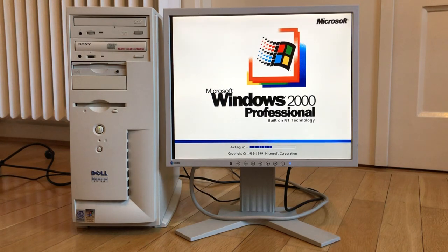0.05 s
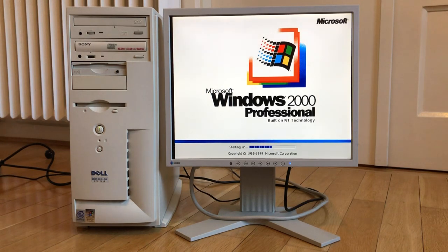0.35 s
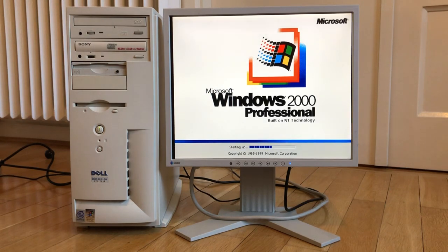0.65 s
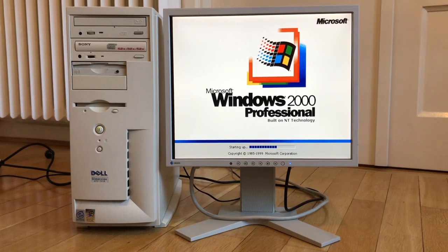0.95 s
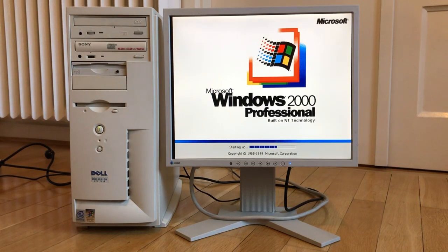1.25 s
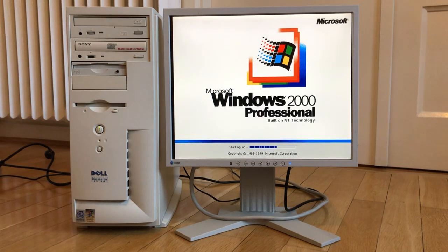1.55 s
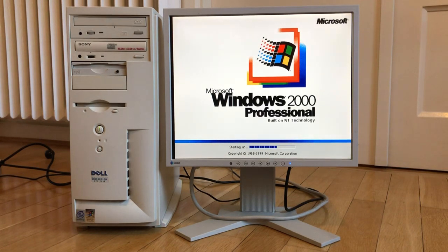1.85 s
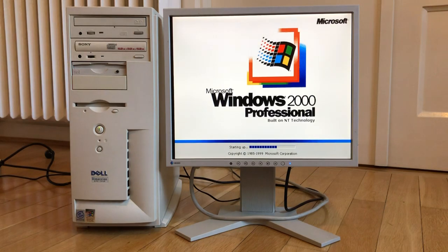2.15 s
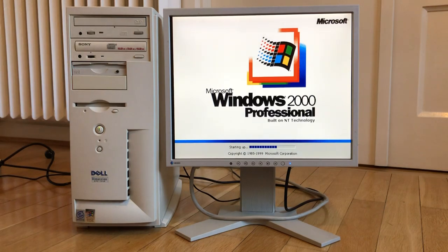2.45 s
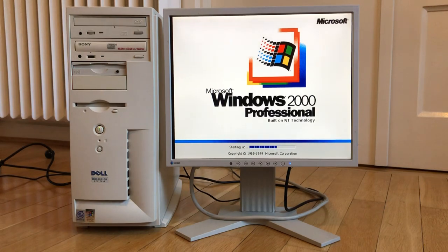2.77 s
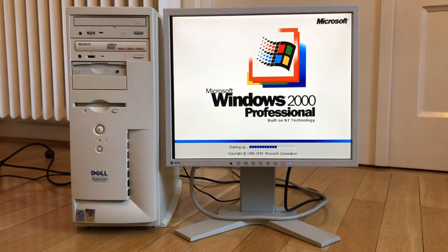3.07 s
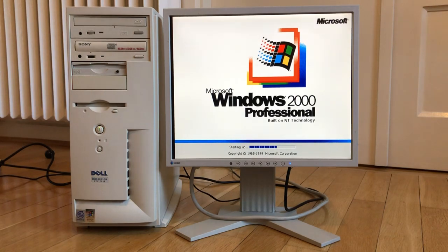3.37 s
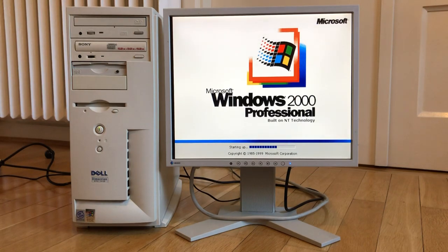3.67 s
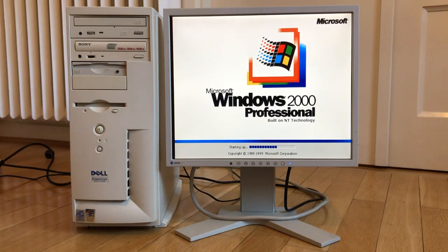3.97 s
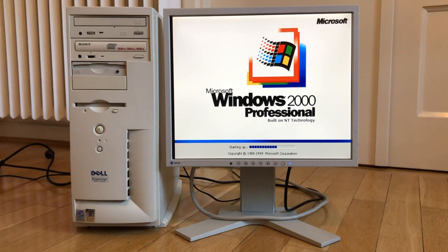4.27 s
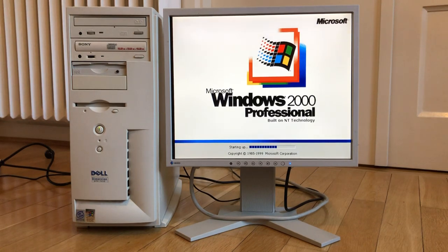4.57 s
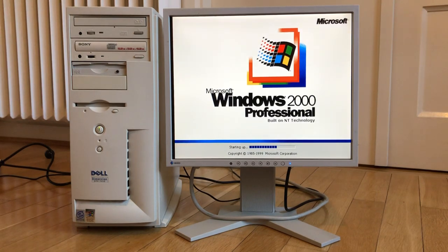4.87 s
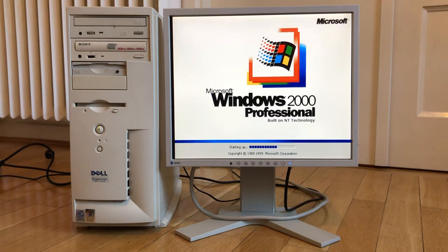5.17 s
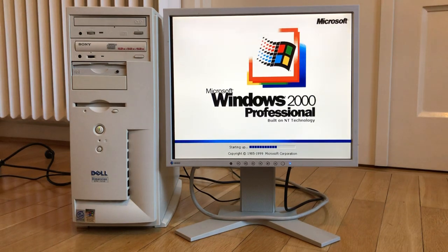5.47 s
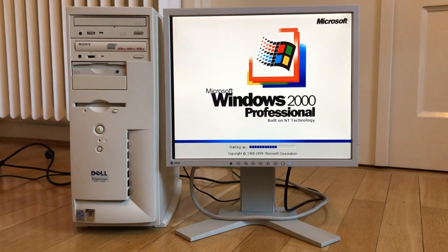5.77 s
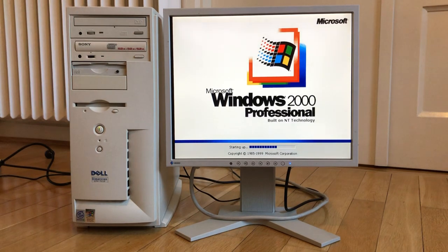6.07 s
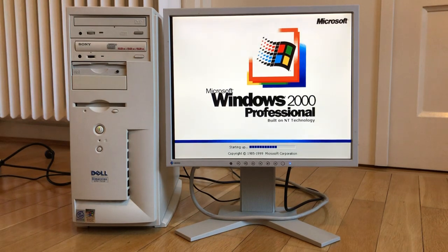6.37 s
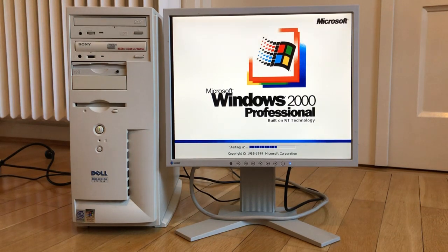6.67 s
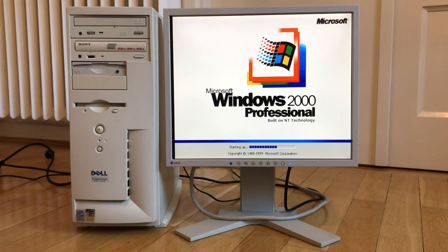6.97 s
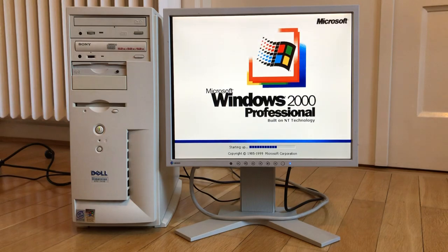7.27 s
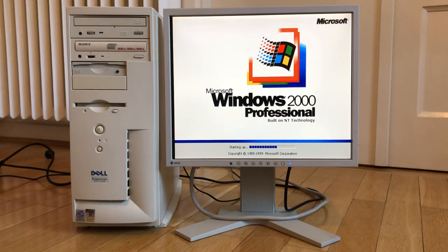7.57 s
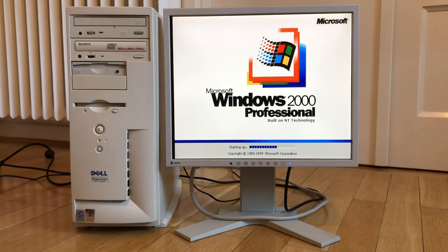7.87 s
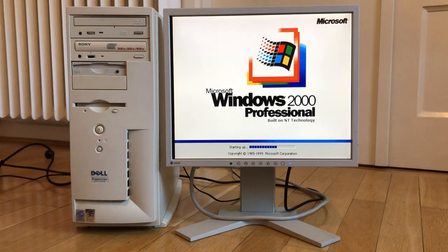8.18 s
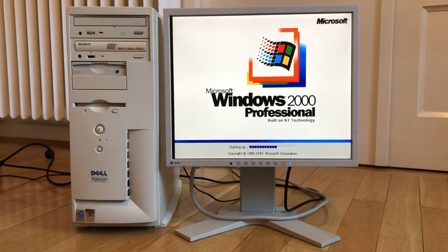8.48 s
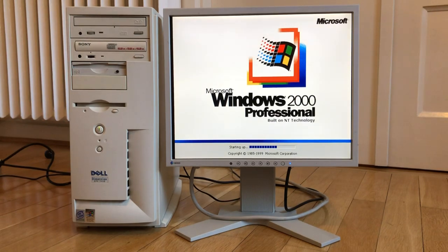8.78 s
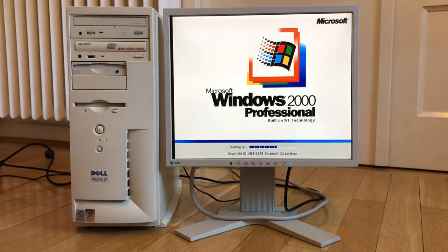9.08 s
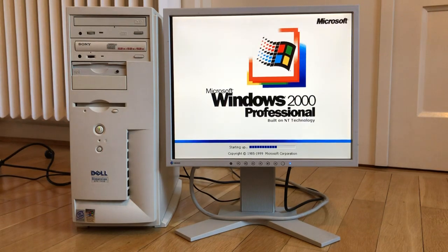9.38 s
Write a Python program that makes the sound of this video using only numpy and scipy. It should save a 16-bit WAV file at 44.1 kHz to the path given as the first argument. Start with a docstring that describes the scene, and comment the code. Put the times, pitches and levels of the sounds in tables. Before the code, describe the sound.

Rapid hard drive rattling with soft thumps thins to scattered ticks while a desktop computer hums and its fans whir.

```python
"""Quick clicks and soft thumps come from a desktop computer starting up in a quiet room.
The hard drive's head jumps between tracks ("seeks") in fast even runs, then in uneven chatter and
single bursts. Every seek clicks in the drive's metal shell and thumps the panels of the tower.
Underneath, the spinning disks hum, motors and bearings whine and pulse, and the fans rush."""
import sys
import numpy as np
from scipy import signal
from scipy.fft import rfft, irfft, next_fast_len
from scipy.io import wavfile
from scipy.ndimage import uniform_filter1d, map_coordinates

SR = 44100
rng = np.random.default_rng(int(sys.argv[2]) if len(sys.argv) > 2 else 0)


def log_audio(samples):
    """Write samples as a 16-bit WAV file to the path given in sys.argv[1]."""
    # one column per channel
    frames = np.atleast_2d(samples).T
    # limit to full scale, then quantise
    limited = np.clip(frames, -1, 1)
    pcm = np.round(limited * 32767).astype(np.int16)
    wavfile.write(sys.argv[1], SR, pcm)


N = 420273
TIME = np.arange(N) / SR
RING_TIME = np.arange(SR // 2) / SR


def head_clicks(seeks, shell_db=18, cage_db=16, crackle_db=16, cage_fade_s=0.035):
    """A coil kicks the head's arm three times a seek: to start it, to brake halfway and to stop it."""
    # The notes of the drive's metal shell. Each row: pitch in Hz, width in Hz, relative level in dB.
    shell_notes = [(1560, 18, -3.5), (2160, 100, -11), (2557, 88, -5.5), (2698, 120, 2), (2794, 96, -2),
                   (2985, 55, -3.5), (3114, 44, -10), (4090, 64, -1.5), (4260, 50, -12.5), (4600, 260, -2),
                   (5010, 67, -18), (5740, 140, -9), (6400, 80, -15), (6840, 130, -10.5), (7130, 66, -10),
                   (7960, 110, -12.5)]
    # The tone of the arm's rattle. Each row: frequency in Hz, gain in dB.
    rattle_tone = [(150, -17), (450, 7.5), (800, 5), (1250, 2), (1800, -1), (2700, 6), (3400, -6),
                   (4500, 2), (5300, -2), (6800, 1), (8000, -0.5), (10000, -21.5), (15000, -43)]
    start, db, travel, stop_db, _ = seeks
    kicks = pulses(start, amp(db))
    kicks -= pulses(start + travel / 2, amp(db + stop_db / 2 - 6))
    kicks += pulses(start + travel, amp(db + stop_db))
    # The cage that holds the drive answers every kick alike, so an even run buzzes.
    cage_ring = rng.standard_normal(len(RING_TIME)) * amp(-60 * RING_TIME / cage_fade_s)
    cage_ring *= 1 - np.exp(-RING_TIME / 0.00098)
    rattle = amp(cage_db) * convolved(kicks, cage_ring) + amp(crackle_db) * crackle(kicks, fade_s=0.12)
    shell = amp(shell_db) * struck(kicks, shell_notes)
    return shell + filtered(rattle, lambda hz: amp(along(rattle_tone, hz)))


def all_seeks(scatter_s=.0005, scatter_travel=.15, scatter_db=1.5, stop_db=-1.5):
    """Every jump of the head, as five arrays: start, click level, travel time, stop kick, thump level."""
    # One step of a run is a long seek and a short one back. Each row: delay in seconds, relative click
    # level in dB, travel time in seconds, stop kick in dB against the first, relative thump level in dB.
    run_step = [(0, -43.5, .0068, -4.5, -45.5), (0.0155, -49, .005, -1, -46)]
    # Bursts of seeks. Each row: start in seconds, number of seeks, gap in seconds,
    # travel time in seconds, relative click level in dB, relative thump level in dB.
    bursts = [(.1987, 1, 0, .0034, -46, -38.5), (0.5819, 1, 0, .0045, -49, -41.5),
              (.880, 6, 0.018, 0.0052, -44.5, -40), (1.0063, 2, .03, 0.004, -50.5, -60),
              (1.1077, 2, 0.0069, .003, -46, -41), (1.14, 3, .02, 0.0043, -45, -40.5),
              (1.213, 3, 0.022, .004, -47.5, -47.5), (1.2798, 2, 0.018, .004, -44.5, -42.5),
              (1.332, 2, .021, .005, -45, -41), (1.397, 2, .0197, 0.0039, -47, -42),
              (1.438, 2, 0.017, .003, -45.5, -38), (1.521, 3, .027, 0.0037, -46, -35.5),
              (1.607, 4, 0.017, .0075, -44.5, -45), (1.68, 6, .0127, 0.0064, -44, -39.5),
              (1.8024, 5, 0.019, .0066, -45.5, -43.5), (1.915, 6, .0177, .007, -45.5, -43),
              (3.599, 1, 0, 0.0066, -43.5, -36.5), (3.691, 2, .0243, 0.0044, -47.5, -42),
              (3.780, 3, 0.024, 0.0066, -49, -50), (3.862, 2, 0.0063, 0.0048, -47.5, -46),
              (4.051, 1, 0, .0013, -51.5, -51), (4.143, 3, 0.0087, 0.0042, -46, -51),
              (4.701, 2, 0.019, .005, -44, -35), (5.464, 1, 0, .006, -49.5, -43),
              (5.7048, 1, 0, 0.0028, -45.5, -39.5)]
    seeks = [(start + delay, *rest) for start in run_times() for delay, *rest in run_step]
    for start, count, gap, travel, click_db, thump_db in bursts:
        # No two seeks of a burst are quite alike.
        for k, (late, far, hard, brake) in enumerate(rng.standard_normal((round(count), 4))):
            seeks.append((start + k * gap + scatter_s * late,
                          click_db + scatter_db * hard,
                          travel * np.exp(scatter_travel * far),
                          stop_db + scatter_db * brake,
                          thump_db + scatter_db * hard))
    return np.transpose(seeks)


def run_times(first_pass_s=.002646, turn_s=.005986):
    """Each step of an even run waits for the right spot on the disk, which comes by once a turn."""
    # The head goes to and fro between two tracks.
    # Each row: rough start in seconds, number of steps, average gap in seconds.
    runs = [(.2349, 11, .03245), (.6012, 8, .0359)]
    wanted = np.concatenate([start + gap * np.arange(steps) for start, steps, gap in runs])
    return first_pass_s + turn_s * np.round((wanted - first_pass_s) / turn_s)


def case_thumps(seeks, lag_s=0.00401, gain_db=27):
    """The arm's recoil, outward and inward by turns, reaches the tower's panels through the cage."""
    # The notes of the panels. Each row: pitch in Hz, width in Hz, relative level in dB.
    panel_notes = [(197, 7.3, -4.5), (252.5, 12.5, 1), (293.6, 7, -3), (332.5, 8.6, -10.5), (376, 36, -20),
                   (461, 38, -20.5), (626, 26, -26.5), (736, 16, -26)]
    start, *_, thump_db = seeks
    place_in_time = np.argsort(np.argsort(start))
    recoil = pulses(start + lag_s, (-1) ** place_in_time * amp(thump_db))
    return amp(gain_db) * struck(recoil, panel_notes)


def arm_sway(start_db=-23.5, stop_db=-26, travel_s=.0064):
    """Each long seek of a run sets the arm ringing as it leaves and again as it lands."""
    # The arm's own notes. Each row: pitch in Hz, width in Hz, relative level in dB.
    arm_notes = [(2663, 110, 11), (4080, 54, -4)]
    starts = run_times()
    leaving = pulses(starts, np.full(len(starts), amp(start_db)))
    landing = pulses(starts + travel_s, np.full(len(starts), amp(stop_db)))
    return struck(leaving + landing, arm_notes)


def housing_ticks(tick_db=10, snap_db=8, snap_hz=6000):
    """The housing gives a few light ringing ticks and one thin snap."""
    # The ticks and the snap. Each row: time in seconds, relative level in dB.
    tick_times = [(6.29, -50), (6.52, -47), (6.641, -40), (6.644, -34.5), (7.05, -51)]
    snap_times = [(4.957, -34)]
    # The notes a tick rings with. Each row: pitch in Hz, width in Hz, relative level in dB.
    tick_notes = [(2130, 90, -5), (2340, 62, -4), (2620, 120, -12), (2860, 55, -7), (3150, 42, 3.5)]
    times, db = np.transpose(tick_times)
    ticks = struck(pulses(times, amp(db + tick_db)), tick_notes)
    times, db = np.transpose(snap_times)
    snap = crackle(pulses(times, amp(db + snap_db)), fade_s=.03)
    return ticks + filtered(snap, lambda hz: (hz > snap_hz) & (hz < 2 * snap_hz))


def spindle(turn_hz=167.3):
    """The disks are slightly off balance: they shake once a turn, which hums. Faint steady bearing tones sound
    along with it."""
    # The hum, strongest during the even runs. Each row: time in seconds, level in dB.
    hum_levels = [(0, -53.5), (.42, -46), (1.03, -51), (9.5, -52)]
    # Faint, lasting bearing tones. Each row: pitch in Hz, level in dB.
    faint_notes = [(2110, -80.5), (2907, -81), (3009, -80), (4587, -80), (5792, -82.5)]
    hum = amp(curve(hum_levels)) * tone(turn_hz, drift_hz=0.3, rate=3.01)
    return hum + sum(amp(db + wobble(8)) * tone(hz, drift_hz=2.41, rate=15) for hz, db in faint_notes)


def motors(pitch_hz=936.5):
    """Two motors whine at almost the same pitch, so their tones pulse: the higher, the faster."""
    # The tones of the whine. Each row: multiple of the pitch, relative level in dB,
    # share of the second motor, share of the slow swell.
    overtones = [(1, -70, .1, 0), (3, -72, .15, .15), (5, -69.3, .45, 0), (6, -81, .4, .9), (7, -86, .3, 0)]
    # How much higher the second motor sounds. Each row: time in seconds, pitch gap in Hz.
    pitch_gap = [(3.9, .476), (4.1, .595)]
    # The whole whine's level, and the slow swell of some tones. Each row: time in seconds, gain in dB.
    whine_levels = [(3.3, -2.5), (4.3, 0)]
    swell_levels = [(0, 1), (2.5, 7), (4.2, 1), (6, 0), (8, 6.5), (9.5, 9.5)]
    first_phase = 2 * np.pi * np.cumsum(pitch_hz + 0.149 * wobble(4)) / SR
    second_phase = first_phase + 2 * np.pi * np.cumsum(curve(pitch_gap)) / SR
    whine_db, swell_db = curve(whine_levels), curve(swell_levels)
    whine = np.zeros(N)
    for multiple, db, second_share, swell_share in overtones:
        pair = np.sin(multiple * first_phase) + second_share * np.sin(multiple * second_phase)
        whine += amp(db + whine_db + swell_share * swell_db) * pair
    return np.sqrt(2) * whine


def bearings(flutter_hz=10, gain_db=-1):
    """The bearings whistle high up; each whistle is three close tones that pulse and flutter together."""
    # The whistles. Each row: pitch in Hz, relative level in dB.
    whistles = [(7397, -82.5), (7585, -85), (7736, -69), (7833, -89), (8274, -88), (8333, -90),
                (8425, -77.5), (8522, -85.5), (8694, -73), (8990, -80), (9022, -84), (9146, -84.5),
                (9362, -77.5), (9458, -82), (9668, -72), (10207, -78), (10524, -72), (10627, -82.5),
                (10858, -85), (11235, -80.5), (11590, -78.5), (12026, -80.5), (12177, -78), (13114, -91)]
    # How fast a whistle pulses. Each row: pitch in Hz, pulses per second.
    beat_rates = [(7600, 3.7), (7900, 3.7), (8700, 10.3), (9670, 11.5), (10500, 5), (12000, 4)]
    # The second tone makes the pulsing, the third the flutter.
    # Each row: pitch in Hz, strength as a share of the first tone.
    twin_shares = [(7800, 0.83), (8700, 0.94), (9670, 0.6), (10400, 0.096), (12000, 0.23)]
    flutter_shares = [(7800, 0.69), (8500, 0.11), (12000, 0.063)]
    sound = np.zeros(N)
    for hz, db in whistles:
        phase = 2 * np.pi * np.cumsum(hz + 1.45 * wobble(12)) / SR
        beat = np.pi * (along(beat_rates, hz) * TIME + 2 * rng.random())
        flutter = 2 * np.pi * (flutter_hz * TIME + rng.random())
        whistle = np.sin(phase + beat) + along(twin_shares, hz) * np.sin(phase - beat)
        whistle += along(flutter_shares, hz) * np.sin(phase - flutter)
        sound += amp(db + gain_db) * whistle
    return np.sqrt(2) * sound


def fans(throb_hz=48, throb_db=-1, hollow_db=-64):
    """Air rushes through the vents and rings the hollow tower, over a low throb and weak blade tones."""
    # The fans' throb. Each row: time in seconds, relative level in dB.
    throb_levels = [(0.0, -64), (0.56, -53), (0.69, -62), (1.94, -50.5), (3.71, -61), (5.17, -51),
                    (6.1, -53.5), (6.16, -67), (7.54, -59), (7.62, -53), (9.5, -56), (9.53, -63)]
    # The tones of the blades. Each row: pitch in Hz, level in dB.
    blade_tones = [(16.5, -57), (90, -65), (139, -70), (456, -71.5)]
    # The notes of the air inside the tower. Each row: pitch in Hz, width in Hz, relative level in dB.
    hollow_notes = [(414, 12, -6), (468, 20, 0.5), (540, 31, -10), (613, 17, -2.5), (942.4, 18, -3),
                    (1017, 26, 1), (1123, 44, -0.5), (1213, 48, -2)]
    # Air moved by the fans, and its hiss over the disks. Each row: frequency in Hz, level in dB per Hz.
    fan_air = [(15, -66.5), (35, -79), (70, -86), (120, -84), (210, -77), (320, -86), (450, -86.5),
               (530, -90.5), (730, -93.5), (1000, -90.5), (1230, -92.5), (1320, -102), (1600, -101.5),
               (1900, -107), (3000, -130)]
    disk_hiss = [(1500, -130), (2200, -101), (2500, -105), (2900, -102), (3400, -107), (4500, -105),
                 (5200, -111), (6500, -110), (7500, -106), (9000, -102), (10000, -104), (11000, -110),
                 (13000, -120), (15500, -123)]
    throb = amp(curve(throb_levels) + throb_db) * tone(throb_hz, drift_hz=1.39, rate=6)
    blades = sum(amp(db + 1.7 * wobble(4)) * tone(hz, drift_hz=1.575, rate=8) for hz, db in blade_tones)
    hollow = amp(hollow_db) * struck(rng.standard_normal(N), hollow_notes)
    return throb + blades + hollow + rush(fan_air, patchy_db=1.12) + rush(disk_hiss, patchy_db=1.4)


def room(sound):
    """The room's echo comes a moment late, and its low notes last longest."""
    # How long the echo lasts. Each row: frequency in Hz, seconds to fade by 60 dB.
    fade_times = [(200, 1), (2000, 0.26), (10000, 0.08)]
    hz, seconds, noise = signal.stft(rng.standard_normal(SR // 2), SR, nperseg=256)
    fade = amp(-60 * seconds / along(fade_times, hz)[:, None])
    tail = signal.istft(noise * fade, SR, nperseg=256)[1]
    return convolved(sound, np.pad(tail, (SR // 200, 0)))


def struck(blows, notes, rise_s=0.0008):
    """Blows ring an object: wider notes die sooner, and neighbours start out swinging opposite ways."""
    ring = np.zeros(len(RING_TIME))
    for k, (hz, width, db) in enumerate(notes):
        fade = np.exp(-np.pi * width * RING_TIME)
        ring += (-1) ** k * amp(db) * width * fade * np.sin(2 * np.pi * hz * RING_TIME)
    return convolved(blows, ring * (1 - np.exp(-RING_TIME / rise_s)))


def crackle(blows, fade_s, rise_s=0.0011):
    """Each blow becomes a fresh puff of noise with the same energy, fading by 60 dB in fade_s."""
    puff = (amp(-60 * RING_TIME / fade_s) * (1 - np.exp(-RING_TIME / rise_s))) ** 2
    energy = signal.fftconvolve(blows ** 2, puff / puff.sum())[:N]
    return np.sqrt(np.abs(energy)) * rng.standard_normal(N)


def tone(hz, drift_hz, rate):
    """A pure tone whose pitch wanders a little."""
    cycles = rng.random() + np.cumsum(hz + drift_hz * wobble(rate)) / SR
    return np.sqrt(2) * np.sin(2 * np.pi * cycles)


def rush(spectrum, patchy_db):
    """Airy noise shaped by (Hz, dB per Hz) rows, with random louder and softer patches."""
    slices = signal.stft(rng.standard_normal(N), nperseg=512)[2]
    patches = uniform_filter1d(rng.standard_normal(slices.shape), size=5, axis=0)
    patches = uniform_filter1d(patches, size=14, axis=1)
    noise = signal.istft(slices * amp(patchy_db * patches / patches.std()), nperseg=512)[1][:N]
    return filtered(noise, lambda hz: amp(along(spectrum, hz))) * np.sqrt(SR / 2)


def amp(db):
    """Turn decibels into a gain to multiply by."""
    return 10 ** (np.asarray(db) / 20)


def along(rows, hz):
    """Read between (Hz, value) rows on a musical (log) scale."""
    frequencies, values = np.transpose(rows)
    return np.interp(np.log(hz + 1), np.log(frequencies + 1), values)


def curve(rows):
    """Join (seconds, value) rows with straight lines, one value per sample."""
    return np.interp(TIME, *np.transpose(rows))


def wobble(rate):
    """A smooth curve through random points, rate of them a second."""
    points = rng.standard_normal(int(N * rate / SR) + 4)
    return map_coordinates(points, [TIME[::64] * rate]).repeat(64)[:N]


def filtered(sound, gain_at):
    """Turn each frequency up or down by gain_at(hz)."""
    size = next_fast_len(N + SR // 2)
    return irfft(rfft(sound, size) * gain_at(np.fft.rfftfreq(size, 1 / SR)), size)[:N]


def convolved(sound, ring):
    """Every sample sets off a copy of the ring, scaled to an energy of 1."""
    return signal.fftconvolve(sound, ring / np.linalg.norm(ring))[:N]


def pulses(times, sizes):
    """One sharp spike at each time."""
    return np.bincount(np.clip(np.round(times * SR).astype(int), 0, N - 1), sizes, N)


def scene(click_echo_db=-9, thump_echo_db=-15):
    """The drive's knocks and their echo over the steady sound of the running computer."""
    seeks = all_seeks()
    clicks = head_clicks(seeks) + arm_sway() + housing_ticks()
    thumps = case_thumps(seeks)
    echo = room(amp(click_echo_db) * clicks + amp(thump_echo_db) * thumps)
    return (clicks + thumps + echo + spindle() + motors() + bearings() + fans())[None]


def record(dry, top_hz=15720):
    """Cut away the very highest treble."""
    return filtered(dry[0], lambda hz: hz < top_hz)[None]


dry = scene()
out = record(dry)
log_audio(out)
```